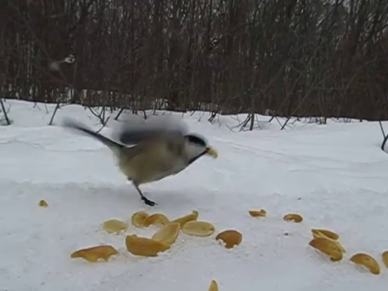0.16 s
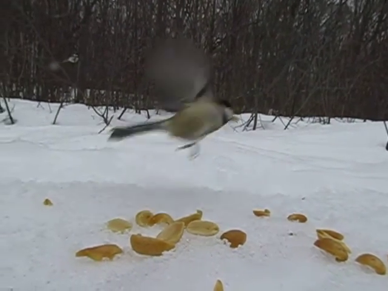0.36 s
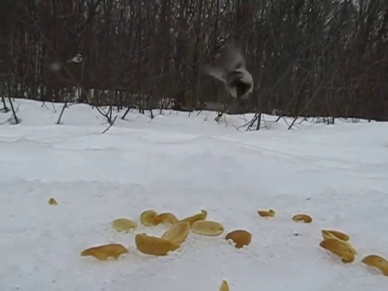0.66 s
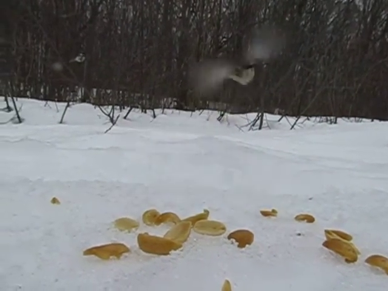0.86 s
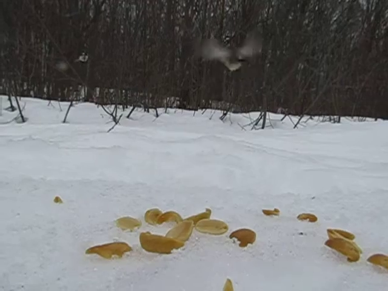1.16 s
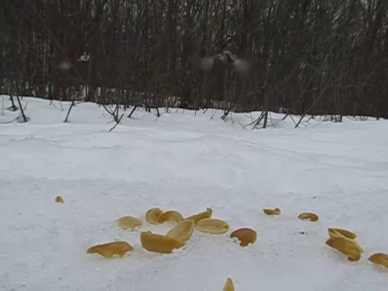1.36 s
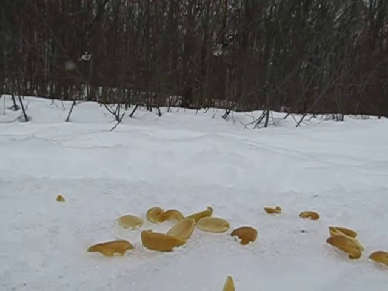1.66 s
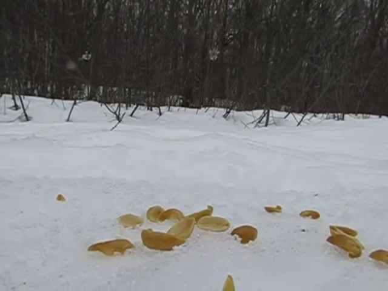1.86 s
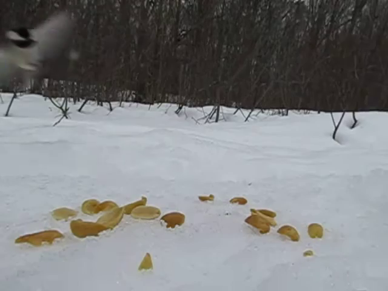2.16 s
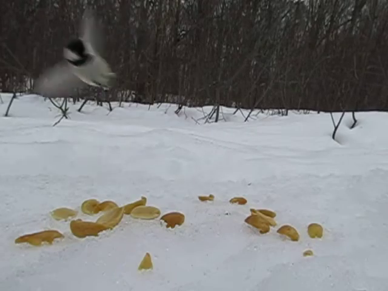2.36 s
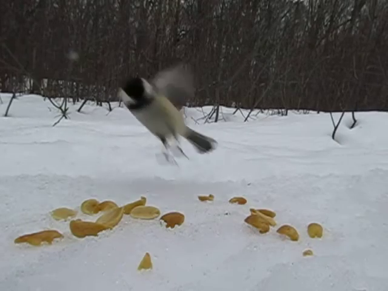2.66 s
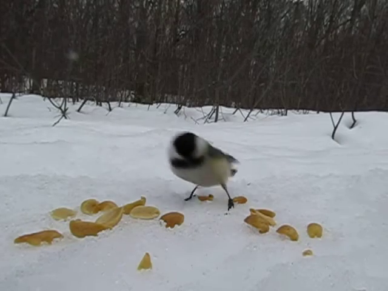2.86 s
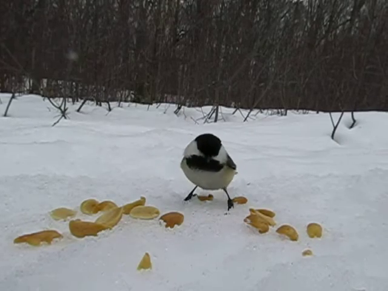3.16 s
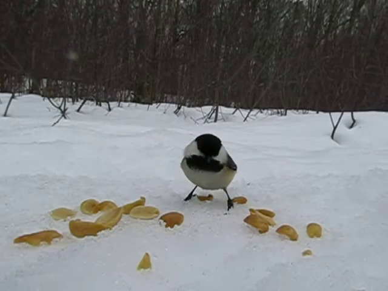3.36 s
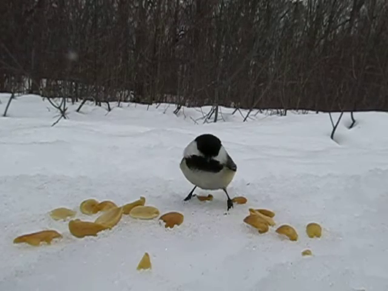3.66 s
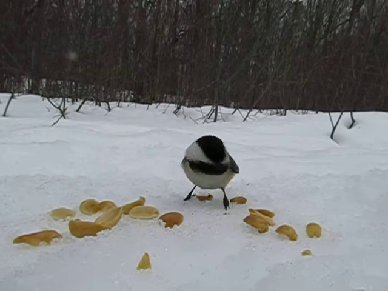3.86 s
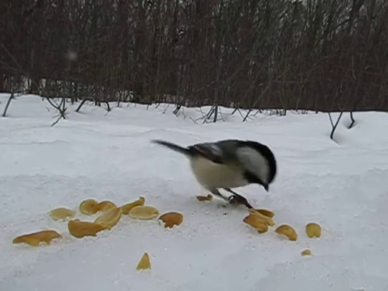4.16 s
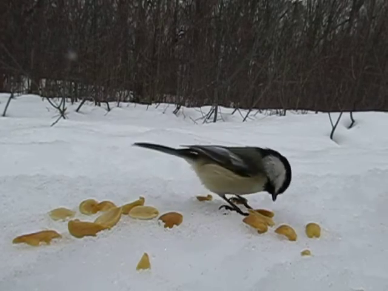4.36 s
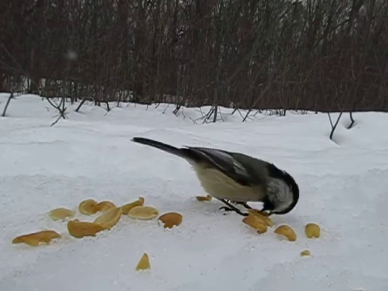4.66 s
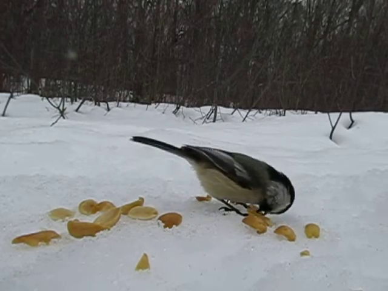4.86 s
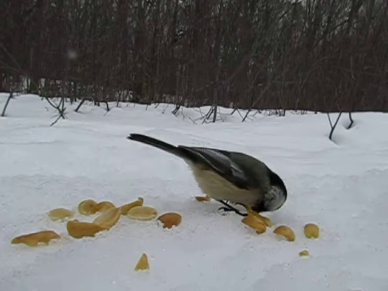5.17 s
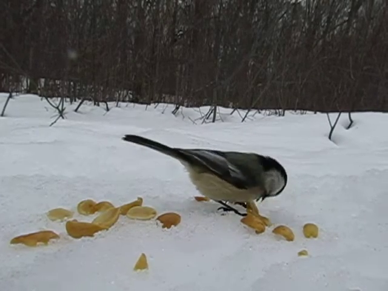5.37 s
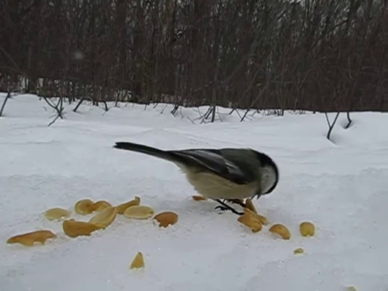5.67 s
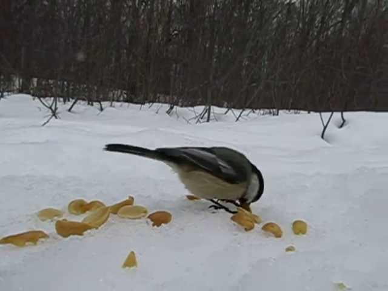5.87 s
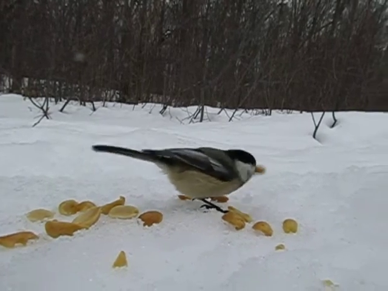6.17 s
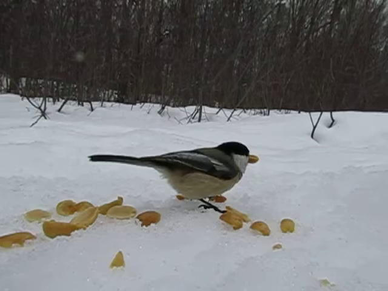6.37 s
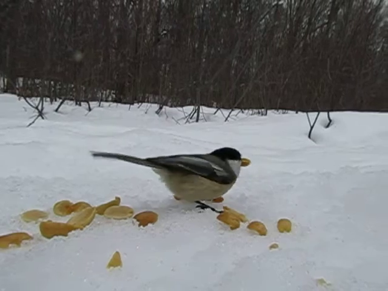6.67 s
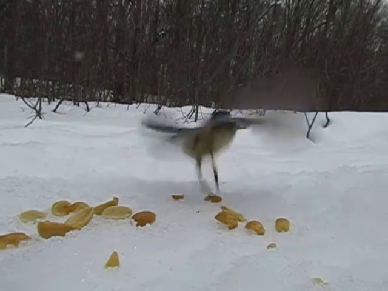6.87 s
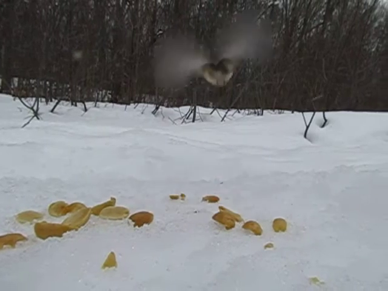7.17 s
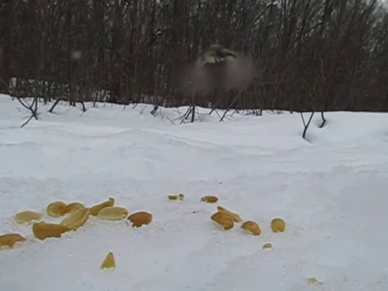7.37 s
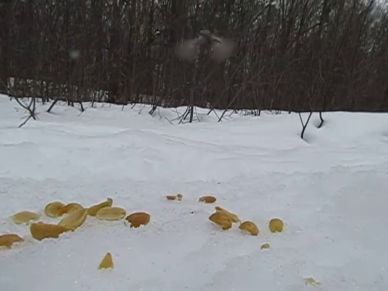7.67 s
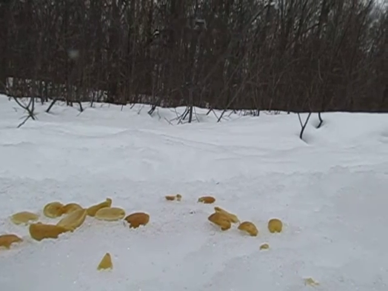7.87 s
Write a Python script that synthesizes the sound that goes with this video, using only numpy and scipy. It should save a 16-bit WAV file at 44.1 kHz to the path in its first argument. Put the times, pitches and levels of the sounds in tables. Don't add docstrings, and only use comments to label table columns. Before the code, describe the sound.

A small woodland bird calls four times, two high piercing whistles then a run of buzzy nasal notes, over faint rumble and air hiss.

```python
import sys
import numpy as np
from scipy import signal
from scipy.fft import rfft, irfft
from scipy.io import wavfile
from scipy.ndimage import uniform_filter1d

SR = 44100
rng = np.random.default_rng(int(sys.argv[2]) if len(sys.argv) > 2 else 0)


def to_wav(s):
    ch = np.atleast_2d(s).T
    pcm = np.round(np.clip(ch, -1, 1) * 32767)
    wavfile.write(sys.argv[1], SR, pcm.astype(np.int16))


def gain_from_db(level_db):
    decades = np.asarray(level_db, float) / 20
    return 10 ** decades


N = 354123

# (time [s], level [dB])
MID_NOISE = [(0, -86.5), (1.5, -85.5), (2.95, -73), (3.02, -79.5), (3.4, -79.5), (4.45, -76.5), (4.705, -78.5),
             (4.715, -89), (6.2, -81.5), (6.26, -90.5), (6.6, -83.5), (8.03, -76.5)]


def rms_one(x):
    return x / np.sqrt(np.mean(x ** 2) + 1e-20)


def at_hz(points, hz):
    point_hz, point_db = np.transpose(points)
    return np.interp(np.log(hz), np.log(point_hz), point_db)


def in_time(rows):
    return np.interp(np.arange(N) / SR, *np.transpose(rows))


def ramps(length, rise_s, fall_s):
    t = np.arange(length) / SR
    return np.clip(t / rise_s, 0, 1) * np.clip(t[::-1] / fall_s, 0, 1)


def drift(shape, rate):
    settle = 10000
    r = np.exp(-2 * np.pi * rate / SR)
    white = rng.standard_normal((shape[0], shape[1] + settle))
    return rms_one(signal.lfilter([1], [1, -2 * r, r * r], white)[:, settle:])


def resonance(x, hz, width):
    r = np.exp(-np.pi * width / SR)
    zeros = np.array([1, 0, -1]) * (1 - r * r) / 2
    return signal.lfilter(zeros, [1, -2 * r * np.cos(2 * np.pi * hz / SR), r * r], x)


def add(out, start, x):
    out[start:start + len(x)] += x[:max(N - start, 0)]


def rumble(white):
    # (centre [Hz], width [Hz], level [dB])
    rumble_bands = [(11.6, 2.9, -1), (32.8, 16, 1), (68.3, 2.6, -9.5), (48.5, 28, -18)]
    # (time [s], level [dB])
    traffic = [(0, -51), (.36, -60), (.55, -54.5), (1.1, -60), (1.9, -53.5), (2.5, -56.5), (3.1, -59),
               (4.5, -60.5), (4.92, -55), (5.4, -60.5), (5.62, -52.5), (5.84, -59.5), (6.0, -51.5),
               (6.45, -57), (7.1, -54), (7.45, -56.5), (7.9, -55), (8.03, -62)]
    # (start [s], end [s], level [dB])
    drone_away = (3.45, 6.45, -5.0)
    away_start_s, away_end_s, sink_db = drone_away
    t = np.arange(N) / SR
    away = 1.0 * (t > away_start_s) * (t < away_end_s)
    away_db = sink_db * uniform_filter1d(away, size=SR // 4)
    total = np.zeros(N)
    for k, (hz, width, db) in enumerate(rumble_bands):
        pole_width = width * 1.26
        band = resonance(resonance(white[k], hz, pole_width), hz, pole_width)
        total += gain_from_db(db + away_db * (k == 2)) * rms_one(band)
    return gain_from_db(in_time(traffic) + 1.7) * rms_one(total)


def background():
    # (time [s], level [dB])
    gusts = [(.6, -77.5), (1.03, -74.5), (1.77, -65.5), (2.03, -72.5), (2.86, -62.5), (3.56, -94),
             (5.03, -70.5), (5.461, -74.5), (5.61, -63), (5.95, -89), (7.13, -68.5), (7.34, -61.5),
             (7.94, -60)]
    # (frequency [Hz], density [dB per Hz])
    hiss_spectrum = [(53, -45), (96, -6), (183, -11), (600, -11), (1500, -15), (2500, -17), (4000, -21.5),
                     (9000, -30)]
    gust_s, calm_db = 0.055, -82
    top_hz, top_db = 12800, -39.5
    t, white = np.arange(N) / SR, rng.standard_normal((5, N))

    gust_db = calm_db + sum((db - calm_db) * np.exp(-((t - s) / gust_s) ** 2) for s, db in gusts)
    low_band = signal.butter(2, [100, 200], "band", fs=SR, output="sos")
    gust = signal.sosfilt(low_band, white[3])
    gust = rms_one(gust * gain_from_db(1.6 * drift((1, N), rate=30)[0]))

    mid_noise_db = in_time(MID_NOISE)
    hiss_db = -72 + 0.22 * (mid_noise_db - mid_noise_db.mean()) + 0.061 * (gust_db - gust_db.mean())
    hz = np.maximum(np.fft.rfftfreq(N, 1 / SR), 1)
    density_db = np.where(hz > top_hz, top_db, at_hz(hiss_spectrum, hz))
    hiss = rms_one(irfft(rfft(white[4]) * gain_from_db(density_db) * (hz > 80), N))
    hiss = hiss * gain_from_db(0.8 * drift((1, N), rate=29)[0])
    return rumble(white) + gain_from_db(gust_db - 10.0) * gust + gain_from_db(hiss_db) * hiss


def mid_noise():
    mid_high = signal.butter(2, [1500, 6500], "band", fs=SR, output="sos")
    return gain_from_db(in_time(MID_NOISE)) * rms_one(signal.sosfilt(mid_high, rng.standard_normal(N)))


def ticks():
    # (time [s], peak level [dB], resonance [Hz])
    snaps = [(1.479, -72, 7060), (1.7044, -74, 3950), (1.7429, -73, 3290), (1.7864, -75, 4270),
             (6.5894, -71.5, 7020), (6.8523, -70, 3290), (6.8964, -74, 4270)]
    out, t = np.zeros(N), np.arange(400) / SR
    for s, db, hz in snaps:
        snap = rms_one(resonance(rng.standard_normal(400), hz, width=1700))
        add(out, round(s * SR), gain_from_db(db + 2.5) * snap * np.exp(-t / 0.0077))
    return out


def whistle(arch, kind):
    # (time [s], half width [s], depth [0-1])
    nulls = [(2.2065, 0.0019, 1), (2.235, 0.0043, 0.6), (2.332, .002, 0.6), (3.424, 0.0093, 0.4),
             (3.444, 0.0052, 0.76), (5.427, 0.0056, 0.76), (5.461, 0.0016, 0.9), (5.555, 0.0014, 0.5)]
    start_s, end_s, top_hz, start_hz, level_db = arch
    end_hz, plunge_s, attack_s, release_s, swell_db = kind
    t = np.arange(start_s, end_s, 1 / SR)
    since, left = t - start_s, end_s - t

    rise_hz = (top_hz - start_hz) * np.exp(-since / 0.0047)
    plunge_hz = (top_hz - end_hz) * np.exp(-left / plunge_s)
    hz = top_hz - rise_hz - plunge_hz
    hz = hz - 220 * np.exp(-since / 0.02086)

    climb = np.clip((top_hz - start_hz) / 1000, 0, 1)
    db = level_db + swell_db * (t - t.mean())
    db = db - 12 * climb * np.clip(1 - since / attack_s, 0, 1)
    db = db - 10.5 * np.clip(1 - left / release_s, 0, 1)

    dips = np.ones(len(t))
    for s, half, depth in nulls:
        dips *= 1 - np.clip(depth, 0, 1) * np.exp(-((t - s) / half) ** 2)
    waver = drift((2, len(t)), rate=50)
    breath = drift((2, len(t)), rate=1100)
    phase = 2 * np.pi * np.cumsum(hz * (1 + 0.0019 * waver[0])) / SR
    tone = dips * gain_from_db(1.1 * waver[1]) * np.sin(phase)
    tone = tone + gain_from_db(-27.5) * (breath[0] * np.sin(phase) + breath[1] * np.cos(phase))
    envelope = gain_from_db(db) * ramps(len(t), rise_s=0.00039, fall_s=0.00054)
    return round(start_s * SR), np.sqrt(2) * envelope * tone


def effort(note, hold):
    start_s, length_s, level_db, top_hz, climb_s = note
    rough, bright_db, sag_hz, swell_db = hold
    t = np.arange(round(length_s * SR)) / SR
    left = length_s - t
    db = level_db + swell_db * (t - length_s / 2)
    db = db - 15.5 * np.exp(-t / 0.011) - 19 * np.exp(-left / 0.005)
    hz = top_hz - (top_hz - 350.4) * np.exp(-(t / climb_s) ** 2)
    hz = hz - sag_hz * t - 40.9 * np.exp(-left / 0.02)
    opening, closing = np.exp(-(t / 0.043) ** 2), np.exp(-(left / 0.0075) ** 2)
    rough = rough + (1 - rough) * opening + (0.83 - rough) * closing
    return round(start_s * SR), db, hz, rough, bright_db + 2.5 * opening


def buzz(note, hold, partials_db):
    start, db, hz, rough, tilt_db = effort(note, hold)
    order = np.arange(3, 3 + len(partials_db))[:, None]
    shape = (len(order), len(hz))
    rough = np.maximum(rough, 0) ** 1.25 * np.minimum(order / 8.0, 1.05)
    rough = np.clip(rough, 0, 1)

    jitter = 1 + 0.004 * drift((1, len(hz)), rate=60)[0]
    phase = order * 2 * np.pi * np.cumsum(hz * jitter) / SR
    phase = phase + 1.1 * drift(shape, rate=12.2)
    phase = phase + 0.2187 * order ** 2

    fading_db = 2.5 * np.clip(order / 11.0 - 0.3, 0, 1) * drift(shape, rate=21)
    colour_db = np.interp(order * hz / np.median(hz), order[:, 0], partials_db)
    gain = gain_from_db(colour_db + tilt_db * np.log2(order / 9.0) + fading_db)

    blur = drift(shape, rate=220) * np.sin(phase) + drift(shape, rate=300) * np.cos(phase)
    partials = np.sqrt(1 - rough ** 2) * np.sin(phase) + rough * blur / np.sqrt(2)
    stack = np.sum(gain * partials, axis=0)
    even = np.sqrt(np.sum(gain ** 2, axis=0) / 2)
    return start, gain_from_db(db) * ramps(len(hz), rise_s=0.0028, fall_s=0.0015) * stack / even


def birds():
    # (start [s], end [s], top [Hz], start pitch [Hz], level [dB])
    arches = [(2.178, 2.25, 7606, 6510, -39), (2.29, 2.344, 6778, 4944, -32.5),
              (3.408, 3.465, 7603, 7400, -33.5), (3.504, 3.558, 6715, 5080, -33),
              (5.403, 5.48, 7604, 6700, -40), (5.517, 5.572, 6725, 5200, -41.5)]
    # (end [Hz], plunge [s], attack [s], release [s], swell [dB per s])
    arch_kinds = [
        (3890, .004, 0.008, 0.006, 50.0),
        (4090, .0073, 0.01, 0.0098, 56),
    ]
    # (start [s], length [s], level [dB], top pulse rate [Hz], climb [s])
    notes_a = [(2.362, 0.17, -47.5, 411.5, 0.025), (2.569, 0.18, -48.5, 399, 0.046),
               (2.786, .186, -47, 407.7, .036)]
    notes_b = [(3.587, .17, -48, 405, 0.031), (3.795, 0.2, -50, 408.6, 0.045),
               (4.039, .174, -49.5, 403, 0.03), (4.268, 0.19, -49, 426.5, 0.031)]
    notes_c = [(5.596, 0.15, -49, 420.3, 0.024), (5.785, 0.19, -48, 407.7, 0.042),
               (6.02, .193, -46.5, 418.5, .038)]
    # (partial [number], level [dB])
    throat_a = [(3, -28.5), (4, -9), (5, -2.5), (6, -11), (7, -13), (8, -4), (9, -6), (10, -1.5),
                (11, -7.5), (12, -7.5), (13, -9.5), (14, -9), (15, -20), (16, -24)]
    throat_b = [(3, -30.5), (4, -9.5), (5, 0), (6, -7.5), (7, -5), (8, -2), (9, 1.7), (10, -10.5),
                (11, -2.3), (12, -11), (13, -4.5), (14, -12.5), (15, -22), (16, -18.5)]
    throat_c = [(3, -48), (4, -31), (5, -15.5), (6, -19), (7, -19), (8, -12), (9, 1), (10, -5.5),
                (11, -10.5), (12, -24.5), (13, -23), (14, -23), (15, -40), (16, -36)]
    hoarse = [.27, .44, .58, .46, .46, .22, .17, .14, .2, .24]
    # (brightness [dB per octave], pitch sag [Hz per s], swell [dB per s])
    note_holds = [(2.4, 170.5, -14), (2.6, 38.5, -15), (2.5, 90.5, -10), (1.5, 80, -20), (2.5, 80.5, -32),
                  (3, -29.5, 17), (3, 159, -10), (5, 212.5, -20), (3, 112, -6), (1.5, 121, 1)]
    # (partial [number], level [dB], other partial [number], its level [dB])
    accents = [(11, 8.5, 8, -3), (12, 1.5, 10, -7.5), (10, 2, 11, -4.5), (8, 2, 12, 1), (10, -3, 9, -0.5),
               (14, 2.5, 13, -4), (12, 5, 14, 2.5), (8, -7, 14, -3), (9, -1.5, 8, -13), (8, -2, 12, 4)]
    again_s = 5.1105
    first, others = np.zeros(N), np.zeros(N)
    for k, arch in enumerate(arches):
        add(first if k < 2 else others, *whistle(arch, arch_kinds[k % 2]))

    holds = zip(hoarse, note_holds, accents)
    for out, notes, throat in [(first, notes_a, throat_a), (others, notes_b, throat_b),
                               (others, notes_c, throat_c)]:
        partial, throat_db = np.arange(3, 3 + len(throat)), np.array(throat)[:, 1]
        for note in notes:
            rough, hold, (one, one_db, other, other_db) = next(holds)
            db = throat_db + one_db * (partial == round(one)) + other_db * (partial == round(other))
            upper_db = db[-1] - 1.5 * np.array([1, 2])
            add(out, *buzz(note, (rough, *hold), np.append(db, upper_db)))
    add(others, round(again_s * SR), first)
    return first + others


def wood(x):
    # (delay [s], level [dB])
    trunks = [(.0021, -32.5), (.0047, -25), (.0073, -18.5), (0.0097, -20.5)]
    near_db, near_t60_s, far_db, far_t60_s = -10, 0.11, -28, 0.65
    t = np.arange(SR) / SR
    near = rms_one(rng.standard_normal(SR) * gain_from_db(-60 * t / near_t60_s)) * gain_from_db(near_db)
    air_loss = signal.butter(4, 4600, fs=SR, output="sos")
    dull = signal.sosfilt(air_loss, rng.standard_normal(SR))
    far = rms_one(dull * gain_from_db(-60 * t / far_t60_s)) * gain_from_db(far_db)
    response = (near + far) / np.sqrt(SR)
    response[0] = 1
    for delay_s, db in trunks:
        response[round(delay_s * SR)] += gain_from_db(db)
    return signal.fftconvolve(x, response)[:N]


def motor():
    # (start [s], end [s], pitch [Hz], level [dB])
    hum = (4.72, 5.42, 254.5, -84.5)
    start_s, end_s, hz, db = hum
    out, length = np.zeros(N), round((end_s - start_s) * SR)
    tone = resonance(resonance(rng.standard_normal(SR), hz, width=7.7), hz, width=8.7)
    tone = rms_one(tone)[-length:]
    add(out, round(start_s * SR), gain_from_db(db) * ramps(length, rise_s=0.019, fall_s=0.05) * tone)
    return out


def scene():
    return (background() + mid_noise() + ticks() + wood(birds()) + motor())[None]


def top_cut(x):
    return signal.sosfilt(signal.butter(12, 16520, fs=SR, output="sos"), x)


def record(dry):
    high_rate = 48000
    taken = np.arange(N * high_rate // SR + 1) * SR // high_rate
    repeated = dry[:, np.minimum(taken, N - 1)]
    back = signal.resample_poly(repeated, 147, 160, axis=1)[:, :N]
    low_pass = signal.cheby2(14, 60, 16120, fs=SR, output="sos")
    return top_cut(signal.sosfilt(low_pass, back))


dry = scene()
out = record(dry)
to_wav(out)
```